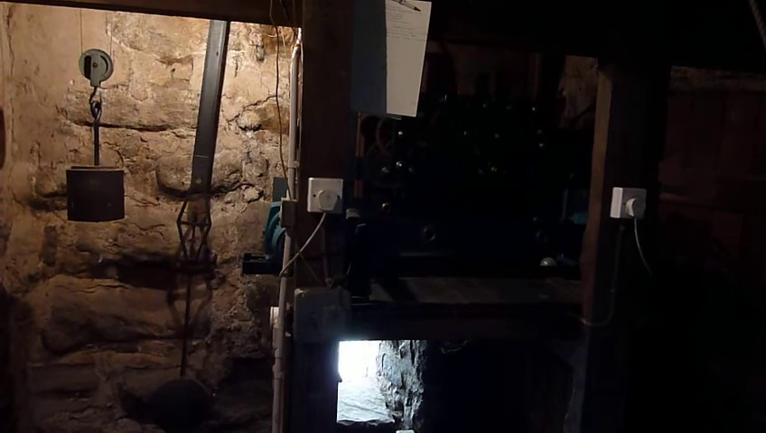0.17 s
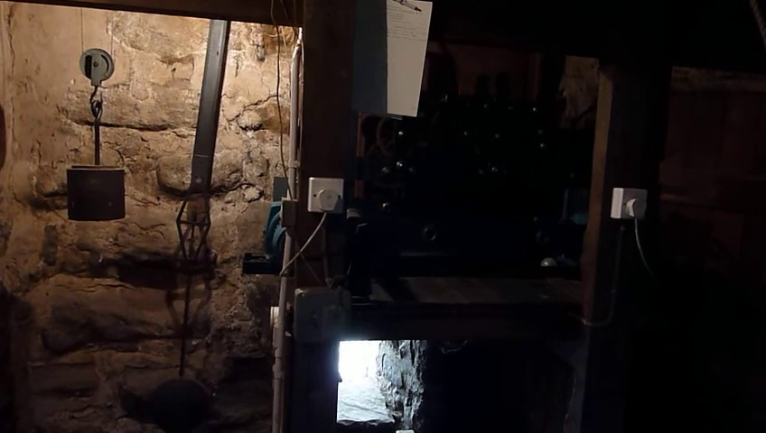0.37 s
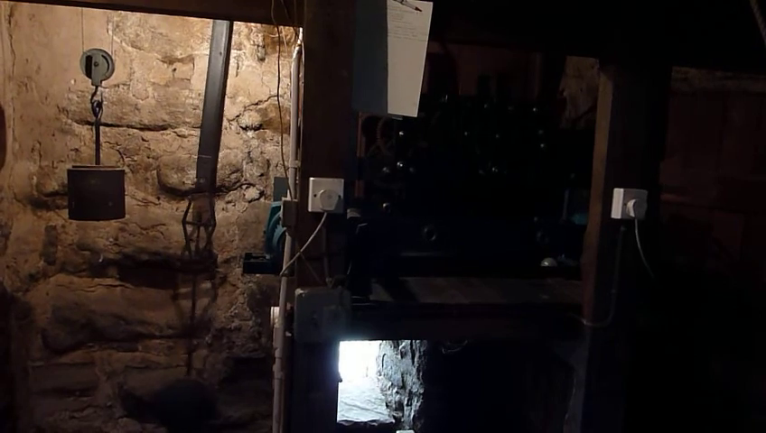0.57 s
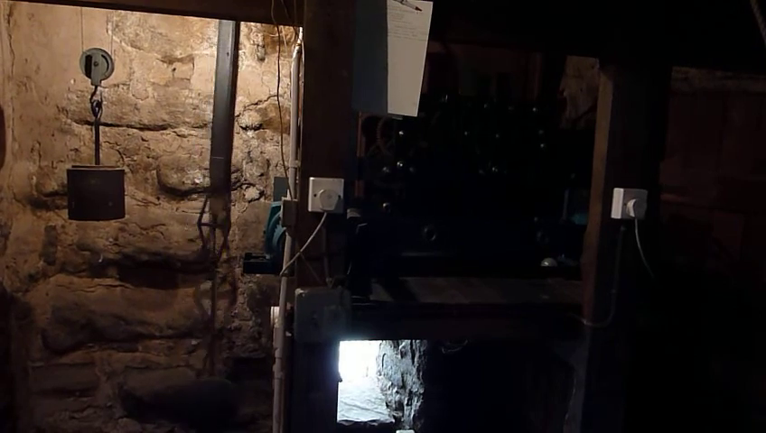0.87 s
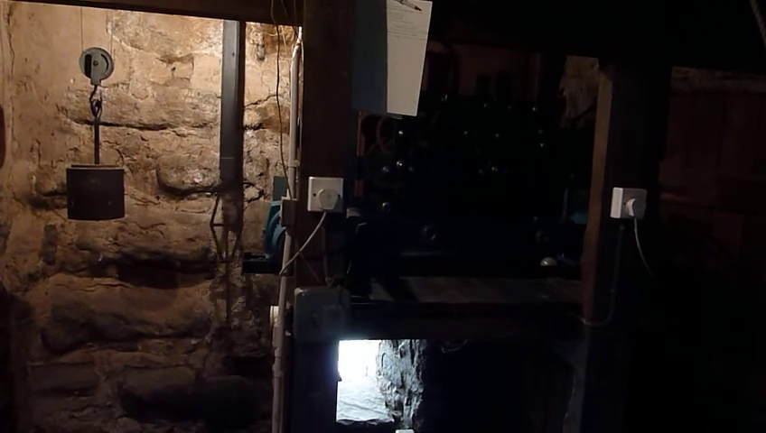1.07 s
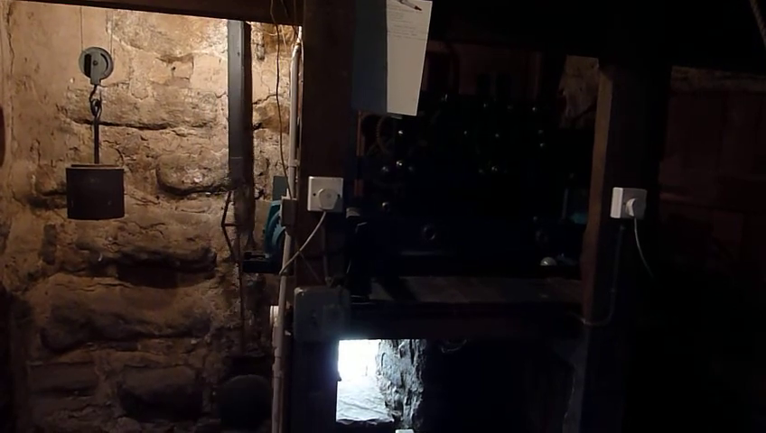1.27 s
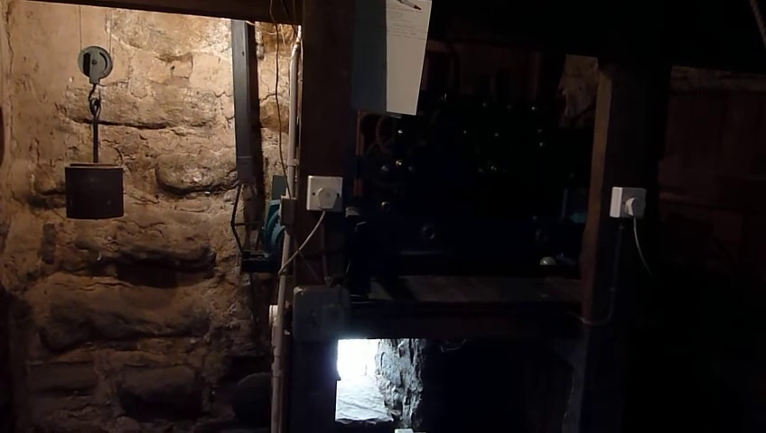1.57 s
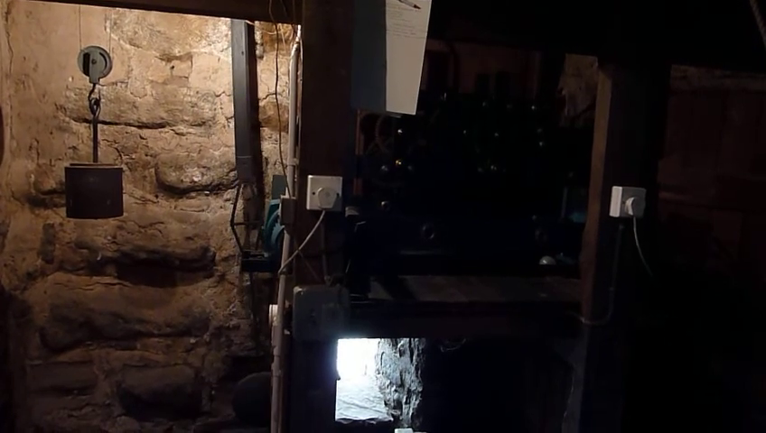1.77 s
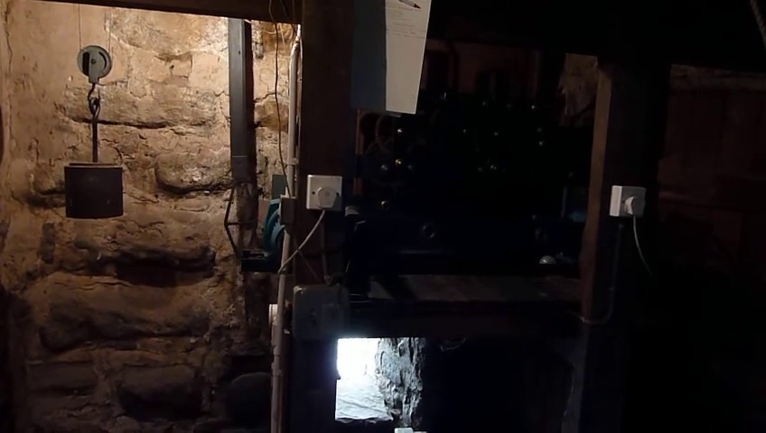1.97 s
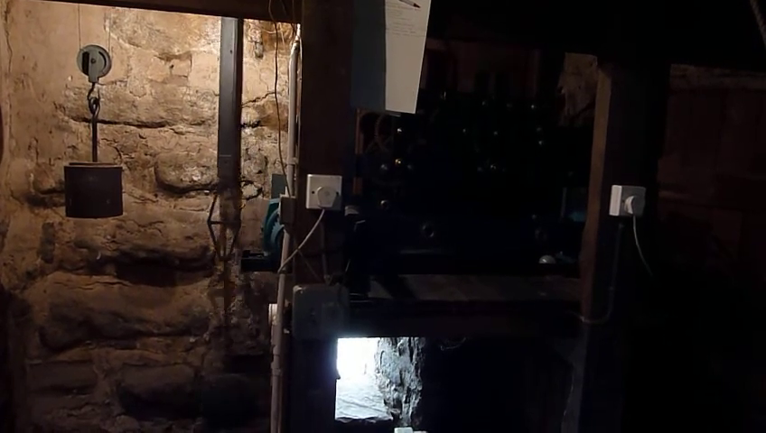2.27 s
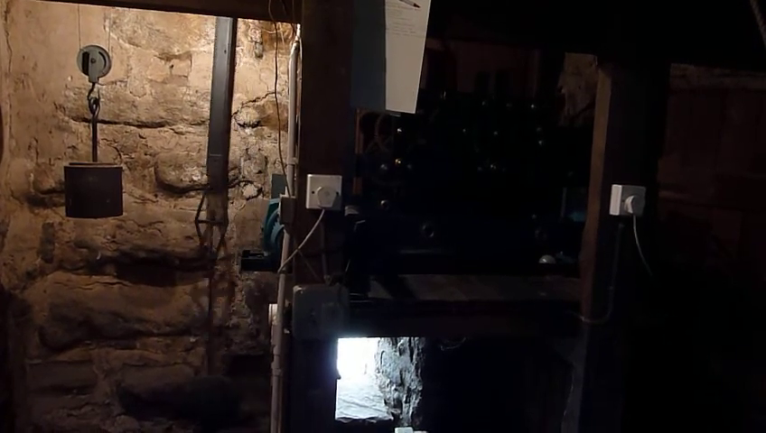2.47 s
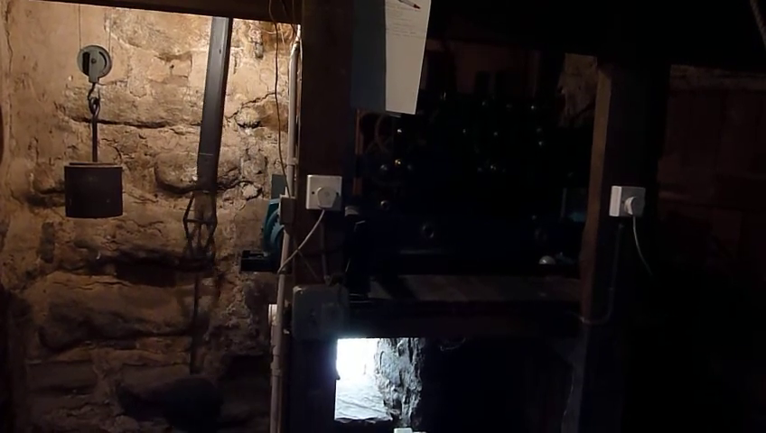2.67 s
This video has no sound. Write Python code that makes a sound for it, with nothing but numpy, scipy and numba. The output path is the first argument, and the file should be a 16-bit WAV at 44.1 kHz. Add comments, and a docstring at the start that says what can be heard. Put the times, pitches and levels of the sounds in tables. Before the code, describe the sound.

A tower clock's big bell sounds with a thump and rings on. Nearby gears whirr and tick, a metal latch snaps, then another thump and a second stroke follow, heard from beside the clockwork in a small stone room.

```python
"""A lever drops, a pull wire rasps and the frame thumps over whirring gears; then a tower clock's large
bell sounds overhead. It strikes twice, its partials beating as they ring on. The microphone stands beside
the movement in a small stone room, where between blows the gear teeth tick, the train knocks and a steel
latch snaps. The camera's gain control ducks on every loud sound."""
import sys
import numpy as np
from scipy import signal
from scipy.fft import rfft, irfft, next_fast_len
from scipy.io import wavfile
from scipy.ndimage import uniform_filter1d
from numba import njit

SR = 44100
rng = np.random.default_rng(int(sys.argv[2]) if len(sys.argv) > 2 else 0)


def unload_wav(signal):
    """Save mono or channel-first audio to the path in sys.argv[1] as 16-bit WAV at rate SR, clipped to [-1, 1]."""
    wavfile.write(
        sys.argv[1],
        SR,
        np.round(np.clip(np.atleast_2d(signal).T, -1, 1) * 32767).astype(np.int16),
    )


N = 124803

# colour of the running train (frequency [Hz], relative density [dB])
WHIRR_COLOUR = [(30, -37.5), (80, -14.5), (140, -10.5), (163, 0), (320, -12.5), (680, -11.5), (850, -19.5),
                (1300, -27), (1620, -13.5), (2300, -26.5), (3350, -17.5), (5400, -37.5), (6600, -23),
                (8000, -70.5)]
# striking gear, its last row a long, bright shimmer of the bell after each blow (time from blow [s], relative
# level [dB], rise [s], t60 [s], tilt [dB/octave])
GEAR_BURSTS = [(-.093, -18, 0.0037, 0.42, 0), (-.042, -25, 0.0024, .3, 4), (-.025, -11, 0.003, 0.32, 0),
               (-.002, -3.5, 0.0066, 0.23, 1.96), (0.018, -8.5, 0.0041, 0.46, -0.5),
               (0.049, -31, 0.046, 1.5, -5), (0.052, -32, 0.042, 2.7, 1.5)]
# colour of the frame's knocks (frequency [Hz], relative density [dB])
FRAME_COLOUR = [(30, -28), (240, 1), (443, -4.5), (967, -9.5), (1350, -14.5), (3080, -18), (5960, -22),
                (8500, -40.5)]
# wooden frame modes (frequency [Hz], relative level [dB], t60 [s])
WOOD_MODES = [(161.8, -10.5, 0.24), (319, -19.5, 0.39), (682, -15.5, 0.22), (905, -7.5, 0.051),
              (1144, -4.5, 0.045)]
# bell partials, each with a second tone: a close, beating twin or a neighbouring partial
# (frequency [Hz], relative level [dB], t60 [s], second tone's offset [Hz], its relative level [dB],
# its lead [cycles], left over right [dB], left lead [rad])
BELL_PARTIALS = [(239.48, -16.3, 40, .5, -30, .9, 1.3, .07), (483.27, -17.5, 14, 2, -20, .1, 1.6, .1),
                 (590.6, -25, 11, .5, -20, .8, 0, .25), (684, -40, 5, 1.6, -8, .1, 1, .1),
                 (972.9, -12, 2.3, 2.7, -14, .2, 2, .2), (1189, -28, 3.4, 20.5, -4, .1, 0, .3),
                 (1440.0, -18, 3, 1.5, -6, .6, 4, .9), (1511.3, -27, 2.5, 1.5, -14, .3, 5, .7),
                 (1964.7, -17, 2.9, 2.5, -14, .8, 0, .5), (2045.9, -29.5, 2.5, 2, -14, .3, 0, .6),
                 (2159.7, -27.5, 1.5, 5, -20, .3, 3, .1), (2544.4, -25.5, 2.1, 2.6, -10, .6, 4, 2.3),
                 (2611, -37, 2, 81, -1, .3, 0, .5), (3163.1, -22, 2.3, 3.2, -14, .7, -6, -.2),
                 (3386, -40, 2.2, 43, -2, .2, 2, .3), (3814.7, -26, 2.1, 2.1, -11, .8, -4, 2.2),
                 (4483, -30, 1.7, 5.9, -6, .9, 4, -.1), (5167.6, -33, 1.8, .9, -16, .3, -5, -2)]
# weak single bell partials (frequency [Hz], relative level [dB])
BELL_SINGLES = [(2993.5, -37), (3924, -46.5), (4247, -43), (4576, -37.5), (5862.1, -35.5)]
# gear teeth (time [s], relative level [dB], upper ring [Hz], upper over lower ring [dB])
TOOTH_TICKS = [(.3412, -35, 6800, -3.5), (0.629, -39.5, 6700, -0.5), (0.743, -39, 6600, -1),
               (0.856, -37, 6800, -11), (1.0092, -45, 6500, -13), (1.0514, -45.5, 6050, 8.5),
               (1.1356, -43.5, 6100, 6.5), (1.168, -36.5, 6700, -1.5), (1.2626, -38.5, 5400, -5),
               (1.326, -34, 6800, -8), (1.359, -50, 6000, 5), (1.4183, -38.5, 6900, -4.5),
               (1.4747, -42, 6800, -6.5), (1.5754, -36, 6300, 0), (1.6967, -45.5, 6700, -1.5),
               (1.7525, -44.5, 6600, 5), (2.0425, -35, 6200, -16), (2.146, -39.5, 6300, -4)]
# low knocks of the train, and two bright rings of one gear tick (time [s], relative level [dB], ring [Hz])
KNOCKS_AND_RINGS = [(0.633, -31, 296), (.638, -36.5, 2354), (.63, -37, 2730), (0.859, -33.5, 170),
                    (1.274, -32.5, 1100), (1.643, -32, 297), (1.673, -39, 420), (1.9, -30.5, 381),
                    (2.187, -26, 702)]
# colour of the latch's snap (frequency [Hz], relative density [dB])
LATCH_COLOUR = [(200, -30.5), (700, -16), (1560, -19.5), (3880, -13), (6700, -16), (8500, -45)]
# steel latch modes (frequency [Hz], relative level [dB], t60 [s], rise [s])
STEEL_MODES = [(3273, -26, .25, .003), (3318, -11, 0.24, .05), (3685, -21, 0.14, .001),
               (4165, -13, 0.17, .015), (4480, -26, .35, .002), (4581, -23, 0.3, .001),
               (5744, -20, 0.22, .015), (6220, -21, 0.1, .001), (6815, -22, 0.27, .003)]

BLOWS_S = [.1, 2.27772]  # the second blow meets the bell's hum out of step and nearly stills it
TIME = np.arange(N) / SR
SIDES = np.array([[.5], [-.5]])  # splits a value between left and right


def undb(db):
    """Gain of a dB value."""
    return 10 ** (np.asarray(db) / 20)


def noise(colour, tilt_db=0., lo_hz=0., hi_hz=1e9):
    """Coloured stereo noise, rms 1 over all bands; left and right part ways in the treble."""
    n = next_fast_len(N)
    f = np.maximum(np.arange(n // 2 + 1) * SR / n, 1)
    hz, db = np.array(colour, float).T
    gain = undb(np.interp(np.log(f), np.log(hz), db) + tilt_db * np.log2(f / 1000))
    gain = gain / np.sqrt(2 * np.sum(gain ** 2) / n) * (f >= lo_hz) * (f < hi_hz)
    side_share = .225 / (1 + (1480 / f) ** 3)
    mid, side = rfft(rng.standard_normal((2, n))) * gain
    return irfft(np.sqrt(1 - side_share) * mid + np.sqrt(side_share) * side * np.sign(SIDES), n)[:, :N]


def band(hz, width):
    """Noise in one resonance; width as a share of its pitch."""
    return noise([(hz / (1 + 5 * width), -36), (hz / (1 + width), -6), (hz, 0),
                  (hz * (1 + width), -6), (hz * (1 + 4 * width), -36)])


def env(at, t60, rise):
    """Quick rise, then an exponential fall; all in seconds."""
    age = np.maximum(TIME - at, 0)
    return (1 - np.exp(-age / rise)) * np.exp(-np.log(1000) * age / t60)


def wander(rate_hz):
    """Random levels, each gliding into the next; spread near 1."""
    hold = int(SR / rate_hz)
    steps = np.repeat(rng.standard_normal(N // hold + 1), hold)
    return 1.2 * uniform_filter1d(steps, hold)[:N]


def whirr():
    """The train runs close by: each octave flickers alone, the treble ones also clatter together."""
    clatter_db = 1.2 * wander(rate_hz=34)
    out = 0
    for lo_hz in 20 * 2. ** np.arange(9):
        level_db = -35.5 + 3 * wander(rate_hz=8.24) + clatter_db * (lo_hz > 1000)
        out += undb(level_db) * noise(WHIRR_COLOUR, lo_hz=lo_hz, hi_hz=2 * lo_hz)
    return out


def striking_gear():
    """Lever, wire and hammer: bursts of frame noise that also ring the woodwork beside the microphone; the
    last, long burst is the bell's bright shimmer."""
    out, impacts = 0, np.zeros(N)
    for offset, db, rise, t60, tilt_db in GEAR_BURSTS:
        first, second = np.add(BLOWS_S, offset)
        bursts = env(first, t60, rise) + undb(1.5) * env(second, t60, rise)
        out += undb(db) * bursts * noise(FRAME_COLOUR, tilt_db)
        for at in first, second:
            impacts[int(at * SR)] += undb(db - 3)
    for hz, db, t60 in WOOD_MODES:
        pole = np.exp(2j * np.pi * hz / SR - np.log(1000) / (t60 * SR))
        out += undb(db) * signal.lfilter([1], [1, -pole], impacts).imag
    return out


def tooth_rattle(hits_per_s=9, t60=.068):
    """Loose play between the teeth sets off four faint, high rings at random."""
    out = 0
    for hz in np.linspace(5900, 7100, 4):
        hits = (rng.random(N) < hits_per_s / SR) * undb(-50 + 2 * rng.standard_normal(N))
        decays = signal.lfilter([1], [1, -1000 ** (-1 / (t60 * SR))], hits)
        out += decays * band(hz, width=.055)
    return out


def bell(rise=.0031):
    """The bell overhead: each blow starts all partials afresh on top of what still rings."""
    blow = 0
    for hz, db, t60, offset_hz, second_db, second_lead, pan_db, left_lead in BELL_PARTIALS:
        second_tone = undb(second_db) * np.exp(2j * np.pi * (offset_hz * TIME + second_lead))
        tones = env(0, t60, rise) * (1 + second_tone) * np.exp(2j * np.pi * hz * TIME)
        at_microphone = undb(db + pan_db * SIDES) * np.exp(1j * left_lead * SIDES)
        blow += (at_microphone * tones).imag
    for hz, db in BELL_SINGLES:
        blow += undb(db) * env(0, t60=1.78, rise=rise) * np.sin(2 * np.pi * hz * TIME)
    return sum(np.pad(blow, ((0, 0), (round(at * SR), 0)))[:, :N] for at in BLOWS_S)


def floor_rumble():
    """The tower floor shudders underfoot after each blow."""
    shudder = sum(env(at, t60=2, rise=.039) for at in BLOWS_S)
    return undb(-34) * shudder * band(hz=86, width=.31)


def tooth_ticks():
    """Gear teeth meet at close range, each tick sounding a lower and an upper ring."""
    out = 0
    for at, db, upper_hz, upper_db in TOOTH_TICKS:
        lower = env(at, t60=.26, rise=.00031) * band(hz=3530, width=.15)
        upper = env(at, t60=.16, rise=.00055) * band(upper_hz, width=.055)
        out += undb(db) * (lower + undb(upper_db) * upper)
    return out


def knocks_and_rings():
    """Low knocks of the train and two bright rings of one gear tick: each a tone plus narrow noise."""
    out = 0
    for at, db, hz in KNOCKS_AND_RINGS:
        tone = np.sin(2 * np.pi * hz * (TIME - at))
        out += undb(db) * env(at, t60=.26, rise=.0031) * (tone + band(hz, width=.086))
    return out


def latch(at=1.852):
    """A bright snap of steel nearby; its rings flutter while the loose part settles, then a rod pings."""
    snap = undb(-16.5) * env(at, t60=.41, rise=.00072) * noise(LATCH_COLOUR)
    steel = 0
    for hz, db, t60, rise in STEEL_MODES:
        flutter_db = 2 * wander(rate_hz=75)
        cycles = hz * TIME + rng.random((2, 1)) / 4  # each side has its own phase
        steel += undb(db + flutter_db) * env(at, t60, rise) * np.sin(2 * np.pi * cycles)
    rod = undb(-28.5) * env(at=1.91, t60=.58, rise=.0067) * np.sin(2 * np.pi * 1141 * TIME)
    return snap + steel + rod


def scene():
    """Clockwork close to the microphone and a little to the left, the bell above."""
    clockwork = whirr() + striking_gear() + tooth_rattle() + floor_rumble()
    clockwork += tooth_ticks() + knocks_and_rings() + latch()
    return undb(.84 * SIDES) * clockwork + undb(2.5) * bell()


@njit
def follow(levels, attack_s, release_s):
    """Level follower with separate rise and fall times."""
    held, out = levels[0], np.empty(len(levels))
    for i, level in enumerate(levels):
        held += (level - held) / (SR * (attack_s if level > held else release_s))
        out[i] = held
    return out


def record(dry, limit_db=-15, ratio=4.9, top_hz=7650):
    """Behind the microphone, the camera's gain control ducks loud sounds and the top is cut."""
    power = uniform_filter1d(np.mean(dry ** 2, axis=0), size=400)
    level_db = follow(10 * np.log10(power + 1e-9), attack_s=.0035, release_s=.11)
    duck_db = np.maximum(level_db - limit_db, 0) * (1 - 1 / ratio)
    lowpass = signal.ellip(8, .2, 70, top_hz, fs=SR, output="sos")
    return signal.sosfilt(lowpass, dry * undb(-duck_db))


dry = scene()
out = record(dry)
unload_wav(out)
```